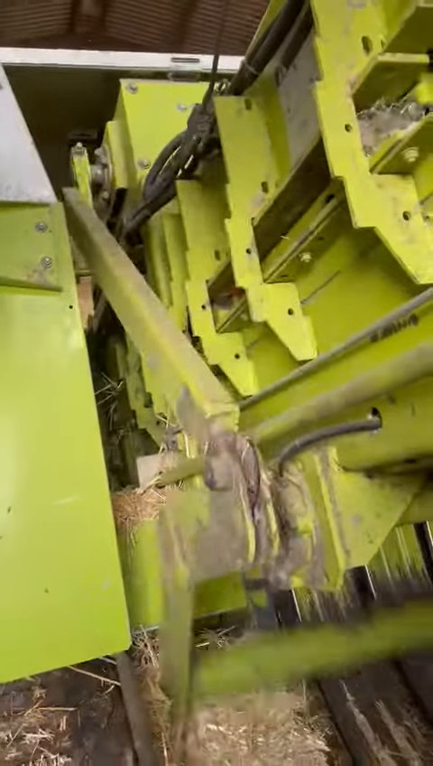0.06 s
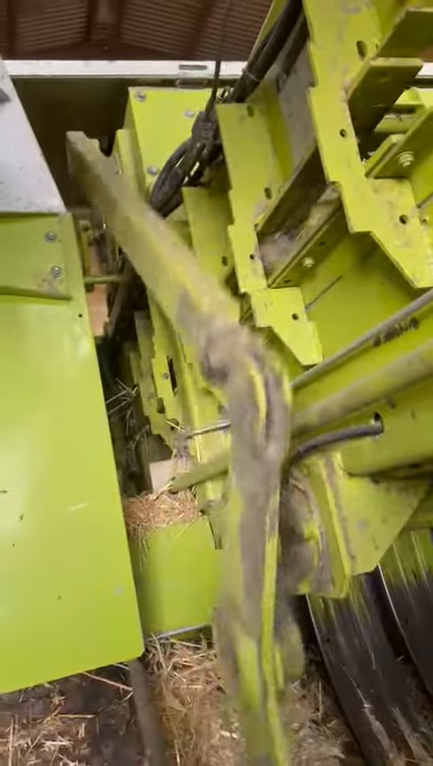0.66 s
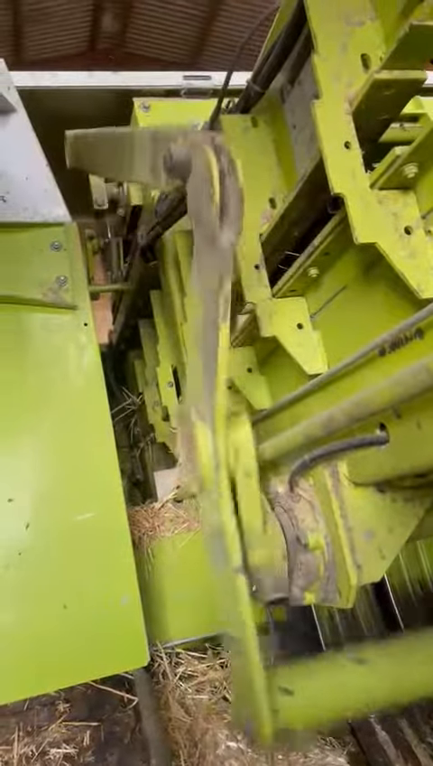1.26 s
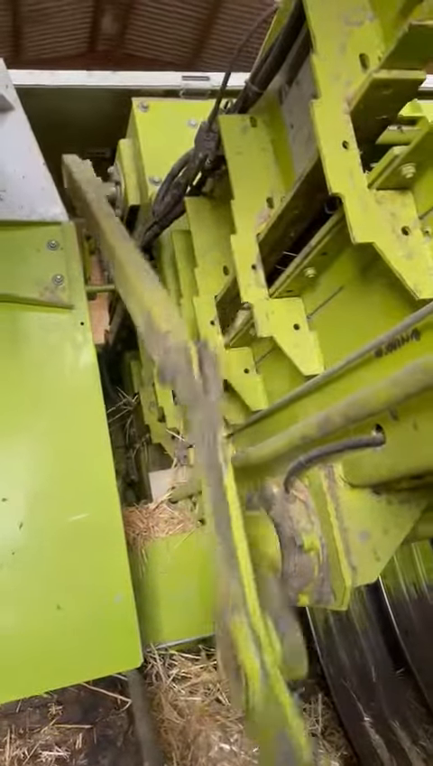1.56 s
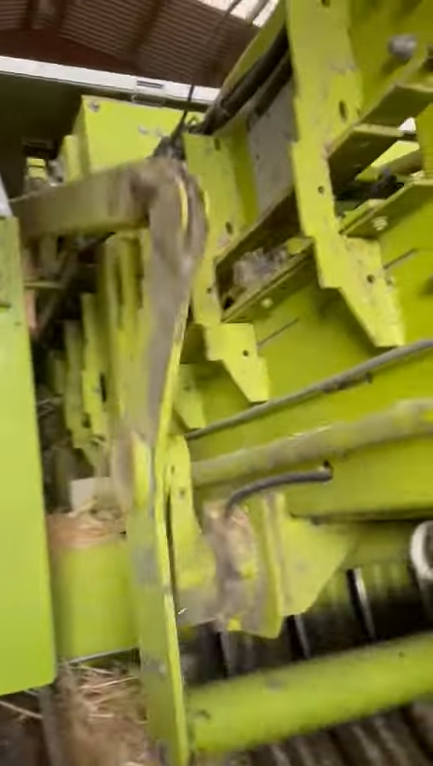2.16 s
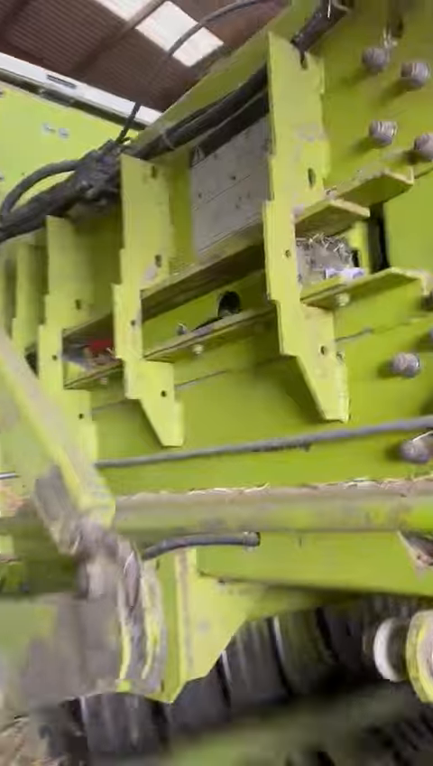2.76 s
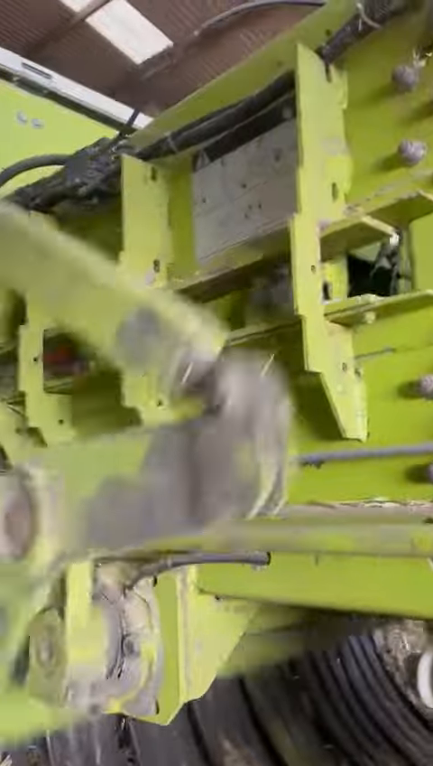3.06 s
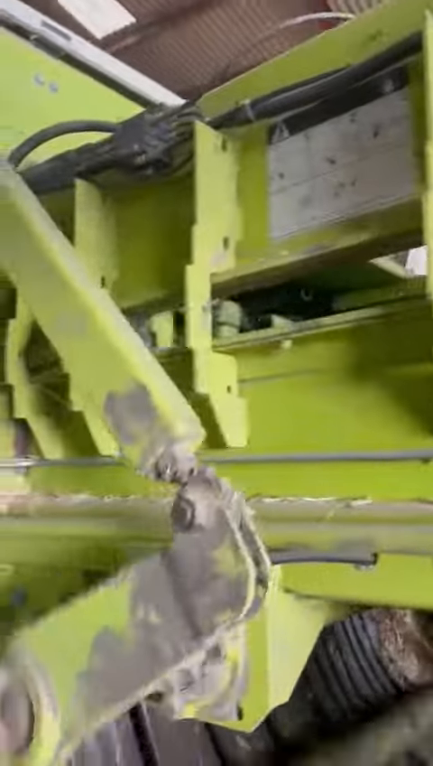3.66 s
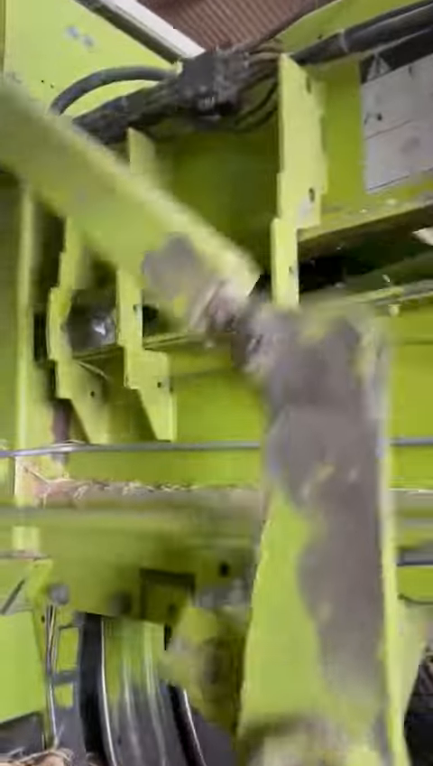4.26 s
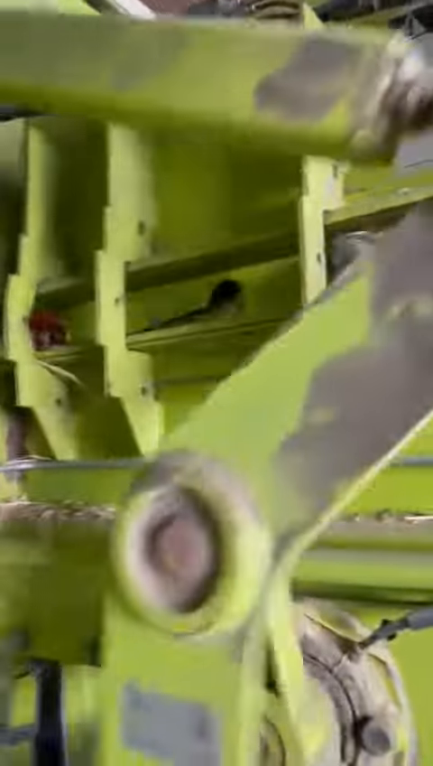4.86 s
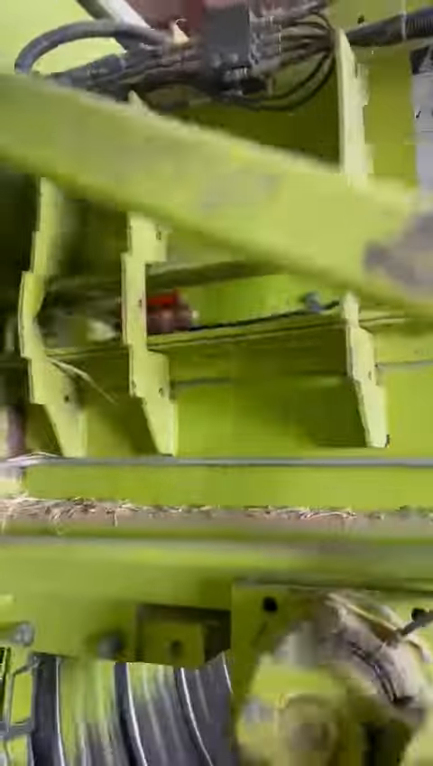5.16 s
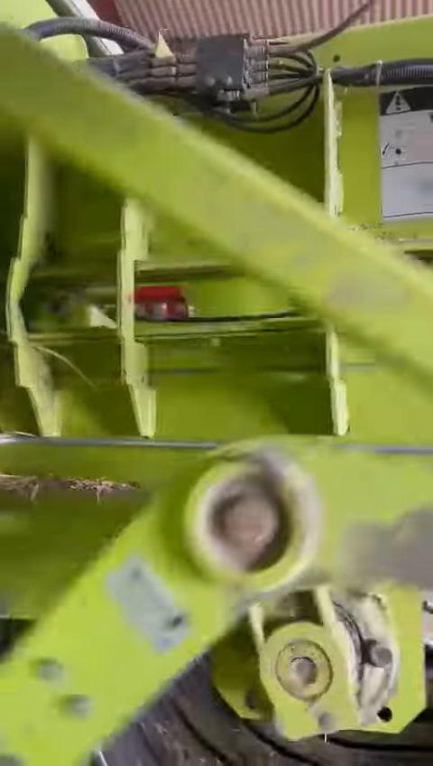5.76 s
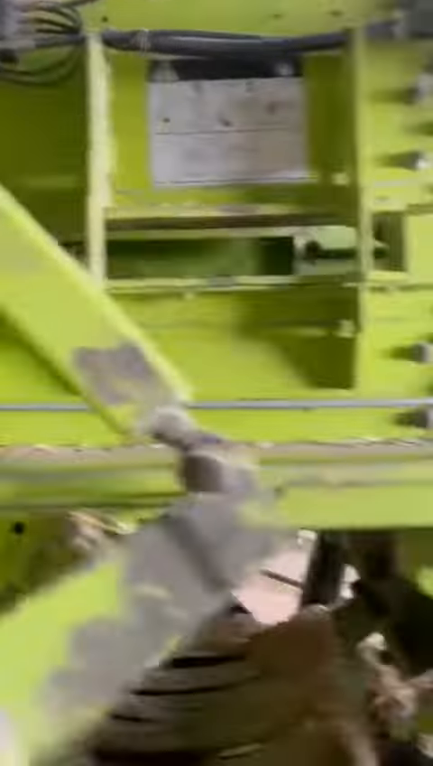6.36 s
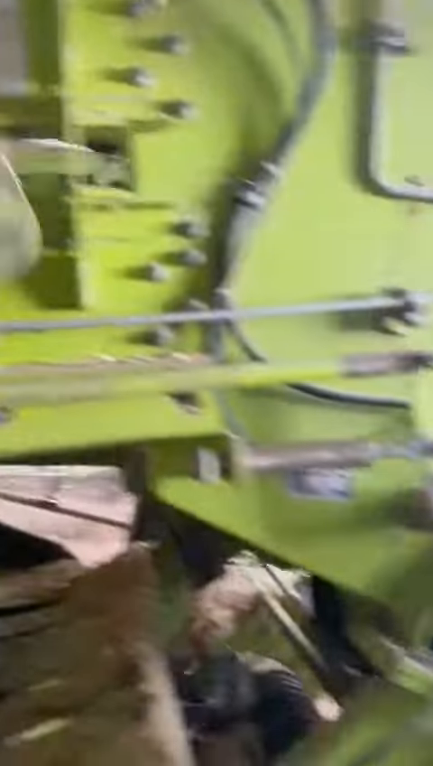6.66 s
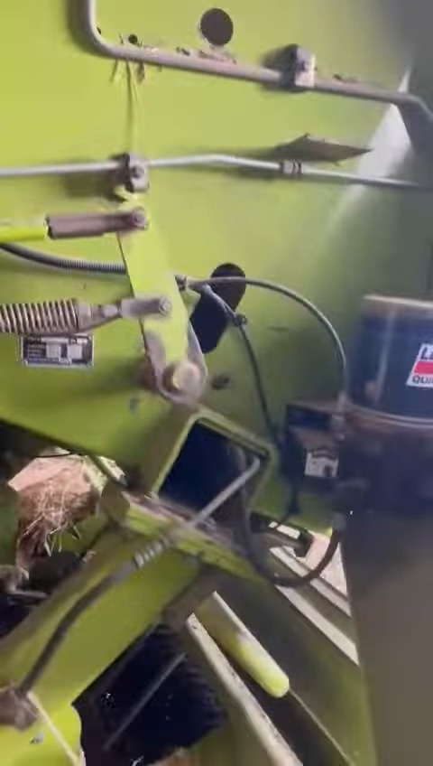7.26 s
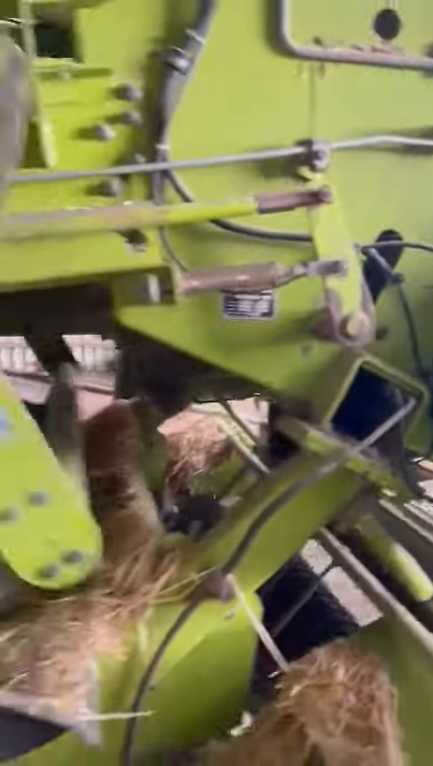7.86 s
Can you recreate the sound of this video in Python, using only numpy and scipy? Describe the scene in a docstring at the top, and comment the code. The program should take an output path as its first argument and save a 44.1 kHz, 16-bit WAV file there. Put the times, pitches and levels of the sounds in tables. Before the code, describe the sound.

Heard up close, a farm baler rumbles steadily while its steel linkage clanks and knocks, its chain rattles and rubbing parts squeak.

```python
"""Square baler in a shed.

Heard beside the linkage. Panels rumble; a sprocket drones; a gear whines and a chain sizzles once
per shaft turn. A slower part rubs and squeaks, small fittings clink. With the plunger strokes,
straw thuds, the frame booms, loose pins clank and the feed rake knocks."""
import sys
import numpy as np
from scipy import signal
from scipy.fft import rfft, irfft, next_fast_len
from scipy.io import wavfile
from scipy.ndimage import map_coordinates

SR = 44100
rng = np.random.default_rng(int(sys.argv[2]) if len(sys.argv) > 2 else 0)


def int16_out(signal):
    """Quantize to a 16-bit WAV file."""
    q = np.round(np.clip(np.atleast_2d(signal).T, -1, 1) * 32767)
    wavfile.write(sys.argv[1], SR, q.astype(np.int16))


N = 348831
T = np.arange(N) / SR
STROKE_S, SHAFT_HZ = 1.378, 15.748

# Modes of a small fitting. Each row: frequency in Hz, level in dB, t60 in seconds.
FITTING_MODES = [(3100, -3, 0.099), (3470, -13, 0.38), (4430, -8.5, 0.35), (4876, -0.5, 0.077),
                 (5220, -4, 0.12), (5460, -5, 0.18), (6200, -3, .07), (9700, -20, .06)]
# Spectrum of small steel parts touching. Each row: frequency in Hz, density in dB.
JINGLE_SPECTRUM = [(2000, -16), (3300, 2), (4300, 2), (5600, 4.5), (7000, -21), (9500, 4), (11500, 3)]


def amp(db):
    """Decibels to gain."""
    return 10 ** (np.asarray(db) / 20)


def unit(x):
    """Scale to rms 1."""
    return x / np.sqrt(np.mean(x ** 2) + 1e-20)


def along(points, hz):
    """Interpolate (Hz, value) points on a log axis."""
    f, v = np.transpose(points)
    return np.interp(np.log(hz + 1), np.log(f + 1), v)


def curves(rows):
    """One value per sample for each column after the time."""
    s, *cols = np.transpose(rows)
    return [np.interp(T, s, c) for c in cols]


def wobble(rate_hz):
    """Smooth random curve, rate_hz knots a second."""
    return map_coordinates(rng.standard_normal(2048), [T * rate_hz], mode="mirror")


def swell(period_s, peak_s):
    """Cycle between -1 and 1."""
    return np.cos(2 * np.pi * (T - peak_s) / period_s)


def filtered(x, response):
    """Apply a complex frequency response."""
    n = x.shape[-1]
    m = next_fast_len(n + 8192)
    return irfft(rfft(x, m) * response(np.fft.rfftfreq(m, 1 / SR)), m)[..., :n]


def coloured(x, spectrum):
    """x through a (Hz, dB) spectrum, at rms 1."""
    return unit(filtered(x, lambda hz: amp(along(spectrum, hz))))


def noise(spectrum, shape=N):
    """Steady noise with a (Hz, dB) spectrum, at rms 1."""
    return coloured(rng.standard_normal(shape), spectrum)


def ticks(rate_hz):
    """Tiny impacts of random time and size."""
    return unit(rng.standard_normal(N) * (rng.random(N) < rate_hz / SR))


def add(track, start_s, sound):
    """Mix a sound into the track."""
    i = max(round(start_s * SR), 0)
    track[i:i + len(sound)] += sound[:N - i]


def throb(turns, depth_db, tight_turn):
    """The drive snaps tight once a shaft turn and eases off more slowly."""
    angle = 2 * np.pi * (turns - tight_turn)
    return unit(amp(depth_db * (np.cos(angle) - 0.25 * np.sin(2 * angle))))


def feeder_load(first_s=0.0064, rise_s=0.038, fall_s=0.1):
    """The feeder lunges three times a stroke; its load rises quickly to 1 and ebbs."""
    age_s = (T - first_s) % (STROKE_S / 3)
    load = (1 - np.exp(-age_s / rise_s)) * np.exp(-age_s / fall_s)
    return load / load.max()


def shed(x):
    """Reverberation: mids linger, treble dies first."""
    # Each row: frequency in Hz, t60 in seconds.
    decay = [(100, 0.28), (1000, 0.51), (4000, 0.16), (12000, 0.015)]
    hz, t, bins = signal.stft(rng.standard_normal(SR // 2), SR, nperseg=256)
    tail = signal.istft(bins * amp(-60 * t / along(decay, hz)[:, None]), SR, nperseg=256)[1]
    return signal.fftconvolve(x, tail / np.linalg.norm(tail))[:N]


def panels():
    """Small jolts shake sheet panels: the rumble follows the plunger, the body the feeder."""
    # Each row: time in seconds, rumble level in dB.
    rumble_levels = [(0, -22), (.9, -18.5), (2.3, -20.5), (3.7, -20), (4.9, -20), (5.7, -24), (6.5, -19.5),
                     (7.91, -20.5)]
    # Each row: frequency in Hz, density in dB.
    rumble_spectrum = [(15, -41), (28, -21), (42, -15), (52, -13.5), (62, -5.5), (72, -6.5), (85, 1.5),
                       (104, -2), (128, -8), (170, -5.5), (260, -57.5)]
    body_spectrum = [(90, -12), (135, 1), (170, 1), (200, 3.5), (230, 1), (285, -0.5), (335, 0),
                     (400, -4.5), (500, -1.5), (600, -6.5), (700, -11), (1000, -17.5), (2000, -42.5)]
    rumble_db = curves(rumble_levels)[0] + 1.5 * swell(STROKE_S, peak_s=0.77) + wobble(9)
    body_db = -22.5 + 4 * feeder_load()
    return amp(rumble_db) * noise(rumble_spectrum) + amp(body_db) * noise(body_spectrum)


def sprocket(turns, ratio=0.4495, teeth=22, sway_rad=0.79, jitter_rad=0.38):
    """Teeth meet the chain in a rough drone; runout sways pitch and level once a sprocket turn."""
    # Each row: time in seconds, levels of harmonics 1, 2 and 3 in dB before trim.
    harmonic_levels = [(0, -19, -23, -26.5), (0.6, -21, -54, -26), (1.2, -29.5, -42, -25),
                       (1.9, -26, -31.5, -23.5), (2.6, -18, -28.5, -27.5), (3.6, -23, -31, -30.5),
                       (4.2, -35, -30, -29.5), (4.8, -23, -28.5, -25), (5.6, -22, -24.5, -35),
                       (6.3, -21, -27, -29.5), (7.1, -26, -22.5, -24), (7.91, -22, -27.5, -24)]
    trim_db = [-1, -2, -0.5]
    angle = 2 * np.pi * ratio * turns
    out = np.zeros(N)
    for k, db in enumerate(curves(harmonic_levels)):
        phase = (k + 1) * teeth * angle + sway_rad * np.sin(angle) + jitter_rad * wobble(16)
        strength = 1 + 0.24 * np.cos(angle) + 0.36 * wobble(24)
        out += amp(db + trim_db[k]) * unit(strength * np.sin(phase))
    return out


def gear(turns, gain_db, tight_turn=0.59, rough_db=-4.5):
    """Off-centre gear: mesh tone and rough tooth contact swell once a turn."""
    # Each row: time in seconds, relative level in dB.
    levels = [(0, -23.5), (0.6, -27.5), (3.9, -26.5), (4.4, -25), (5.3, -24), (6.5, -25.5), (7.3, -28.5),
              (7.91, -21.5)]
    # Mesh tone and sidebands. Each row: shaft order, level in dB.
    mesh = [(33, 1), (34, 3.5), (35, -3), (36, -10), (40, -4.5)]
    angle = 2 * np.pi * (turns - tight_turn)
    drift_rad = 0.32 * wobble(18)
    whine = sum(amp(db + 3.9 * wobble(6)) * np.sin(order * angle + drift_rad) for order, db in mesh)
    rough = noise([(300, -54), (450, 3.5), (560, -7.5), (640, -12), (900, -27)])
    rough *= throb(turns, 6.7, tight_turn)
    return amp(curves(levels)[0] + gain_db) * (unit(whine) + amp(rough_db) * rough)


def link_pings(spectrum, spread_db, count=2800, t60_s=0.08):
    """Chain links ping at random, each with its own pitch and size."""
    t = np.arange(SR // 25) / SR
    when, pitch, size = rng.random((count, 3)).T[:, :, None]
    hz = 2800 + 4200 * pitch
    rings = amp(-spread_db * np.log(size + 0.05) - 60 * t / t60_s) * np.sin(2 * np.pi * hz * t)
    samples = (when * N).astype(int) + np.arange(len(t))
    return coloured(np.bincount(samples.ravel(), rings.ravel(), N)[:N], spectrum)


def singing_steel(flare_db=6):
    """Chain jolts keep steel resonances ringing; each flares and fades on its own."""
    # Each row: frequency in Hz, bandwidth in Hz, level in dB.
    resonances = [(1110, 130, 12), (2796, 32, 8), (2890, 20, -4), (3590, 28, 1.5), (4240, 48, 3),
                  (5200, 44, 4.5), (5630, 35, -1)]
    out = np.zeros(N)
    for hz, width, db in resonances:
        ring = unit(filtered(ticks(400), lambda f: 1j * f * width / (hz * hz - f * f + 1j * f * width)))
        out += amp(db) * unit(ring * amp(flare_db * np.tanh(wobble(9))))
    return unit(out)


def chain(turns):
    """Rollers clatter on the sprockets, keep the steel singing and sizzle as the chain tightens."""
    # Each row: time in seconds, relative level in dB.
    levels = [(0, -39.5), (.9, -40), (1.4, -37.5), (2.3, -39), (3.3, -36.5), (4.5, -42.5), (5.1, -37),
              (6.7, -37), (7.91, -38)]
    # Each row: frequency in Hz, density in dB.
    clatter_spectrum = [(350, -30), (700, -1), (1000, -4), (1600, -4.5), (2800, -9.5), (4000, -22),
                        (6500, -36), (12000, -57)]
    link_spectrum = [(1200, -10), (3000, 2), (4300, -1.5), (5600, -8), (6800, 1.5), (8000, -22),
                     (9500, -22), (11500, 5)]
    clatter = coloured(ticks(4000), clatter_spectrum) * amp(1.36 * wobble(35))
    clatter *= throb(turns, 0.78, 0.78) * amp(-33 + 0.5 * feeder_load())
    links = unit(noise(link_spectrum) + link_pings(link_spectrum, spread_db=2.5))
    snatch_turns = turns + 0.034 * wobble(36)  # never tightens at quite the same angle
    links *= throb(snatch_turns, 2.6, 0.53) * amp(1.7 * wobble(22))
    singing = singing_steel()
    flicker_db = 3 * wobble(16) + 2 * wobble(3) + 3 * wobble(200)
    tension = unit(throb(snatch_turns, 11, 0.59) * amp(flicker_db))
    sizzle = tension * noise([(4000, -17), (5800, -31), (6800, 12), (8000, -2), (9500, -1), (11500, 4.5)])
    steel = amp(0.5) * links + amp(-1.5) * singing + amp(2.5) * sizzle
    return clatter + amp(curves(levels)[0]) * steel


def chain_jingles(gain_db):
    """Links clink and scrape together while the chain hangs slack."""
    # Each row: middle in seconds, length in seconds, relative level in dB.
    spells = [(1.014, 0.079, -36), (1.466, 0.043, -39.5), (1.869, 0.079, -34), (2.545, 0.044, -31),
              (3.397, 0.15, -38), (4.268, 0.25, -38), (4.5, 0.061, -37), (4.592, 0.093, -34.5),
              (5.407, 0.094, -32), (5.689, 0.085, -31.5), (6.008, 0.053, -29), (6.126, 0.062, -32),
              (6.318, 0.18, -36.5), (6.519, 0.066, -37), (6.792, 0.13, -39.5), (7.003, 0.17, -36)]
    slack = sum(amp(db) * np.exp(-(2 * (T - mid_s) / length_s) ** 4) for mid_s, length_s, db in spells)
    links = unit(link_pings(JINGLE_SPECTRUM, spread_db=1.5) + 0.8 * noise(JINGLE_SPECTRUM))
    return amp(gain_db) * slack * unit(links * amp(1.1 * wobble(90)))


def loose_parts(count=110, ring_db=-14.5, spread_db=34.5, t60_s=0.11):
    """Small parts tick at random, each time ringing a new mix of the fitting's modes."""
    # Each row: time in seconds, relative level in dB.
    levels = [(0, -34), (3.8, -35), (4.6, -28), (6.8, -22), (7.91, -21.5)]
    out, t = np.zeros(N), np.arange(SR // 16) / SR
    hz, mode_db, _ = np.transpose(FITTING_MODES)[:, :, None]
    for when, softness in rng.random((count, 2)):
        mix = rng.standard_normal(hz.shape) * amp(mode_db)
        ring = unit((mix * np.sin(2 * np.pi * hz * rng.normal(1, 0.03) * t)).sum(0))
        tick = noise(JINGLE_SPECTRUM, len(t)) + amp(ring_db) * ring
        add(out, when * N / SR, amp(-spread_db * softness - 60 * t / t60_s) * tick)
    return amp(curves(levels)[0]) * out


def rubs(tone_db=-4, scrape_db=2, flare_db=7, waver=0.015, rasp=0.016):
    """Steel rubs steel about every 1.1 s: a dry scrape in which the part's modes flare at random."""
    # Each row: end in seconds, length in seconds, relative level in dB.
    passes = [(0.642, 0.085, -32), (1.775, 0.13, -33), (2.858, 0.18, -36), (3.99, 0.16, -32),
              (5.107, 0.18, -32), (6.191, 0.14, -29.5), (7.299, 0.21, -31)]
    # Each row: frequency in Hz, level in dB.
    modes = [(3550, -2.5), (3970, -2), (5250, -5.5), (5600, -5.5), (5960, 0.5), (9400, -1), (10100, -11),
             (10700, 1), (11250, 1.5)]
    contact = sum(amp(db) * np.exp(-(2 * (T - end_s) / length_s + 1) ** 6)
                  for end_s, length_s, db in passes)
    tone = np.zeros(N)
    for hz, db in modes:
        cycles = np.cumsum(hz * (1 + waver * wobble(90) + rasp * wobble(900))) / SR
        tone += amp(db + flare_db * np.tanh(wobble(70))) * np.sin(2 * np.pi * cycles)
    scrape = noise([(2500, -20), (3600, 14), (4500, -3), (5600, 12), (6500, -18),
                    (7600, -17), (8700, -7), (10000, 1), (11500, 11)])
    return contact * (amp(tone_db) * unit(tone) + amp(scrape_db + 3.3 * wobble(120)) * scrape)


def squeaks(gain_db, sag=0.014, waver=0.0057, rasp=0.0081, overtone_db=-3.5):
    """Where the rub grips, one mode sings a short chirp that sags in pitch."""
    # Each row: start in seconds, length in seconds, relative level in dB, pitch in Hz.
    grips = [(0.53, 0.09, -34.5, 5850), (0.593, 0.043, -35, 5880), (1.647, 0.035, -36.5, 5970),
             (1.668, .1, -35, 5770), (1.724, 0.041, -34, 3540), (2.755, 0.036, -33.5, 5850),
             (3.831, .03, -34, 3750), (3.858, .025, -35, 3560), (4.48, .025, -33, 5760),
             (4.497, 0.031, -35, 5250), (4.583, .028, -37, 5600), (4.914, .035, -31.5, 4040),
             (4.957, 0.028, -31, 3550), (4.979, .025, -34, 5500), (5.011, 0.025, -35.5, 5260),
             (5.03, .03, -33, 4000), (5.053, 0.019, -34.5, 5700), (5.067, .02, -31, 3600),
             (6.075, 0.035, -31.5, 3560), (6.091, .028, -33, 5900), (6.771, 0.043, -42, 5150),
             (7.118, 0.039, -39, 5000), (7.16, .026, -38.5, 5860), (7.197, 0.024, -32.5, 3500),
             (7.218, 0.032, -36, 5400), (7.255, .034, -36, 3920), (7.262, 0.031, -31, 5670)]
    out = np.zeros(N)
    for start_s, length_s, db, hz in grips:
        progress = np.linspace(0, 1, round(length_s * SR))
        slow, fast = (noise([(edge_hz, 0), (2 * edge_hz, -40)], len(progress)) for edge_hz in (50, 400))
        pitch_hz = hz * (1 + sag * (0.5 - progress) + waver * slow + rasp * fast)
        phase = 2 * np.pi * np.cumsum(pitch_hz) / SR
        tone = unit(np.sin(phase) + amp(overtone_db) * np.sin(2 * phase))
        arch = np.sqrt(np.abs(np.sin(np.pi * progress)))
        add(out, start_s, amp(db + gain_db + 1.9 * slow + 2.3 * fast) * arch * tone)
    return out


def straw_thuds(gain_db, rise_s=0.0062, fall_s=0.054):
    """Plunger and feeder pack a wad of straw; the dull push shakes the bale chamber."""
    # Each row: start in seconds, relative level in dB.
    wads = [(0.914, -8.5), (1.431, -17.5), (2.319, -31), (3.25, -31), (3.679, -22.5), (4.182, -17),
            (5.09, -13), (5.228, -18), (6.42, -16.5), (7.72, -21)]
    # Each row: frequency in Hz, density in dB.
    spectrum = [(25, -13), (50, 7), (100, 11.5), (150, 3), (250, 1.5), (400, 0), (700, -7.5), (1000, -21),
                (2000, -55)]
    t = np.arange(SR // 2) / SR
    push = (1 - np.exp(-t / rise_s)) * np.exp(-t / fall_s)
    shaking = np.zeros(N)
    for start_s, db in wads:
        add(shaking, start_s, amp(db + gain_db) * push / push.max())
    return shaking * noise(spectrum)


def contacts(t, slack_s, rise_s, t60_s, touch_db, rebound_db):
    """Envelope of one blow: the part touches, crosses its slack, seats and rebounds."""
    energy = 0
    for delay_s, db in [(0, touch_db), (slack_s, 0), (2 * slack_s, rebound_db)]:
        age_s = np.maximum(t - delay_s, 0)
        energy += (amp(db - 60 * age_s / t60_s) * (1 - np.exp(-age_s / rise_s))) ** 2
    return np.sqrt(energy)


def blows(hits, modes, rattle, gain_db, ring_db, crack_db, touch_db, rebound_db, jostle_rad, detune):
    """Each blow cracks, rattles the plates and rings modes: one favoured, the rest randomly detuned."""
    # Steel meeting steel. Each row: frequency in Hz, density in dB.
    crack_spectrum = [(300, -11), (1500, -2), (3000, 1), (5500, -1.5), (7500, -24), (12000, -11)]
    out, t = np.zeros(N), np.arange(SR // 2) / SR
    hz, mode_db, mode_t60_s = np.transpose(modes)[:, :, None]
    for start_s, db, favoured_hz, boost_db, slack_s, rise_s, rattle_t60_s in hits:
        envelope = lambda t60_s: contacts(t, slack_s, rise_s, t60_s, touch_db, rebound_db)
        distance_hz = np.abs(hz - favoured_hz)
        favoured = distance_hz == distance_hz.min()
        pitch_hz = np.where(favoured, favoured_hz, hz * (1 + detune * rng.standard_normal(hz.shape)))
        size = amp(mode_db + np.where(favoured, boost_db, 2 * rng.standard_normal(hz.shape)))
        # Loose parts chop their own ring and shake it out of tune.
        buzz = 1 + 0.26 * noise([(60, 2), (300, -44)], len(t))
        jostle = jostle_rad * noise([(70, 10), (250, -56)], (len(hz), len(t)))
        phase = 2 * np.pi * (pitch_hz * t + rng.random(hz.shape)) + jostle
        ring = buzz * (size * envelope(mode_t60_s) * np.sin(phase)).sum(0)
        crack = envelope(t60_s=0.02) * noise(crack_spectrum, len(t))
        plates = envelope(rattle_t60_s) * noise(rattle, len(t))
        add(out, start_s, amp(db + gain_db) * (plates + amp(ring_db) * ring + amp(crack_db) * crack))
    return out


def fitting_clinks():
    """A small hard fitting bounces and rings high."""
    # Each row: start in seconds, level in dB, favoured Hz, its boost in dB,
    # then slack, rise and rattle t60 in seconds.
    hits = [(.283, -36, 6200, 4, 0.0029, .0005, .04), (2.254, -25, 4840, 3, .006, .0005, 0.055),
            (2.559, -18, 4310, 6, 0.0075, .0005, 0.046), (3.331, -32, 3180, 6, .006, 0.00056, .046),
            (4.192, -13, 5200, -7, 0.0096, .003, 0.21), (4.229, -9, 3625, 17.5, 0.0016, 0.00027, 0.036),
            (4.482, -26, 4890, 5, 0.0054, .001, .09), (4.775, -13, 5220, -3.5, 0.0076, 0.0013, 0.08),
            (5.231, -23, 6150, 2, .005, 0.00055, .039), (5.934, -24, 4300, 3, 0.0071, .0005, .049),
            (6.128, -15, 5460, 8, .007, .001, 0.11), (6.285, -15.5, 4270, 12.5, 0.0073, 0.00043, 0.081),
            (6.744, -26, 5250, 11, .006, .001, .07), (6.924, -16.5, 5220, -4, 0.0044, .001, 0.11),
            (7.003, -16, 5460, 3, 0.0042, .0005, .05), (7.775, -23, 6150, 5, 0.0051, 0.00036, 0.055)]
    # Each row: frequency in Hz, density in dB.
    rattle = [(800, -3), (2000, -0.5), (3300, -6), (5000, -1.5), (6300, -3), (8000, 3), (10000, -5),
              (12000, 2)]
    return blows(hits, FITTING_MODES, rattle, gain_db=-8.5, ring_db=-9, crack_db=-7,
                 touch_db=1, rebound_db=-1, jostle_rad=0.65, detune=0.0069)


def frame_booms():
    """The frame booms under blows and shoves."""
    # Each row: start in seconds, level in dB, favoured Hz, its boost in dB,
    # then slack, rise and rattle t60 in seconds.
    hits = [(.498, -9.5, 1440, 7, 0.0073, 0.0046, 0.16), (.917, -15.5, 229, 12, .002, 0.00063, 0.043),
            (.945, -9.5, 776, 6, 0.016, 0.007, .12), (.99, -18.5, 1050, 1, 0.0066, .0028, 0.17),
            (2.32, -13, 785, 13, .008, 0.0073, 0.3), (2.745, -8, 790, 4, 0.0067, 0.0065, 0.13),
            (3.246, -9.5, 1308, 12, .011, 0.0023, 0.17), (3.672, -7, 1304, 3.5, .008, 0.0084, 0.13),
            (3.719, -14, 1520, 4, 0.0094, .005, 0.11), (5.095, -7.5, 1126, 10, 0.011, .0008, 0.12),
            (5.503, -8.5, 786, 6.5, .008, 0.00052, 0.089), (5.996, -11.5, 1150, 8, 0.0094, 0.0046, 0.17),
            (6.43, -8.5, 1158, 8.5, 0.014, 0.012, 0.089), (6.479, -15.5, 1130, 10, 0.0038, .002, 0.033),
            (6.516, -19, 2480, 2, 0.0069, .001, 0.052), (7.829, -17, 1060, 9, 0.014, .0035, 0.31)]
    # Each row: frequency in Hz, level in dB, t60 in seconds.
    modes = [(221, 8, 0.17), (790, -1, 0.1), (1021, 2, .07), (1136, 3.5, 0.16), (1315, 3.5, .085),
             (1456, 4, .08), (2620, -1.5, 0.26), (3740, -24, .1)]
    # Each row: frequency in Hz, density in dB.
    rattle = [(50, -8), (200, 15), (600, 13), (1100, 4), (1800, 4.5), (3000, -2), (5000, -6), (12000, -26)]
    return blows(hits, modes, rattle, gain_db=-8.5, ring_db=-13.5, crack_db=-10,
                 touch_db=-1, rebound_db=-10, jostle_rad=0.52, detune=0.012)


def pin_clanks():
    """Loose pins clank as they take up their play."""
    # Each row: start in seconds, level in dB, favoured Hz, its boost in dB,
    # then slack, rise and rattle t60 in seconds.
    hits = [(.085, -7, 2500, 12.5, 0.009, 0.00047, .06), (.49, -10.5, 1910, 6, 0.0064, 0.00036, 0.023),
            (1.423, -16.5, 2400, 5, .009, 0.0048, 0.28), (2.752, -16.5, 2934, 13, .009, .006, .04),
            (2.839, -10.5, 1970, 10, 0.01, .0003, 0.13), (2.885, -23, 2934, 14, 0.011, 0.011, 0.069),
            (3.247, -14, 3540, 12, .008, 0.00033, .06), (4.16, -15.5, 1980, 14, 0.0082, 0.0067, 0.18),
            (5.096, -14.5, 3770, 6, 0.0069, 0.00033, 0.058), (5.504, -23, 2200, 4, 0.0073, .0003, 0.049),
            (5.594, -12.5, 1970, 9.5, 0.0087, 0.00032, 0.22), (5.613, -16.5, 5190, 8, 0.0043, .0003, 0.06),
            (5.998, -22, 3620, 9, .008, .001, .07), (6.455, -19, 2250, 9, .016, 0.0066, 0.13),
            (6.511, -20, 2200, 10, 0.0052, .0005, 0.046), (6.923, -16.5, 2950, 8, 0.0077, 0.0037, 0.2)]
    # Each row: frequency in Hz, level in dB, t60 in seconds.
    modes = [(1366, 0.5, .07), (1723, -6.5, .2), (1975, 2, 0.041), (2250, -2, 0.036), (2536, -7.5, 0.13),
             (2934, -8.5, 0.57), (3180, -3, .08), (3560, -2.5, 0.057), (3980, -1, .07), (4850, -3, 0.065),
             (5080, 0, 0.08), (5220, -10, 0.092), (5960, -11, .07), (6060, -17, .08)]
    # Each row: frequency in Hz, density in dB.
    rattle = [(250, 1), (800, 9), (1300, 2.5), (2400, 2), (3500, -2.5), (5000, -6.5), (6500, -3.5),
              (12000, -13.5)]
    return blows(hits, modes, rattle, gain_db=-7, ring_db=-11.5, crack_db=3,
                 touch_db=-3.5, rebound_db=-8, jostle_rad=0.65, detune=0.015)


def rake_knocks():
    """The feed rake knocks as it reverses, once a stroke."""
    # Each row: start in seconds, level in dB, favoured Hz, its boost in dB,
    # then slack, rise and rattle t60 in seconds.
    hits = [(.721, -14, 1510, 4, 0.0026, 0.00022, 0.11), (2.096, -13.5, 2298, 2, 0.0096, 0.00025, 0.09),
            (3.477, -13, 1795, 2, 0.0082, .0004, 0.094), (4.849, -17, 888, 16.5, 0.0045, 0.00035, 0.17),
            (6.23, -14, 1505, -4, 0.0088, 0.00034, 0.13), (7.61, -16.5, 1890, -1, 0.0053, .0004, 0.093)]
    # Each row: frequency in Hz, level in dB, t60 in seconds.
    modes = [(927, -3, 0.03), (1416, 1, 0.05), (1570, 8, 0.035), (1820, 6, 0.031), (1960, -2, 0.082),
             (2220, -0.5, 0.063)]
    # Each row: frequency in Hz, density in dB.
    rattle = [(200, 4), (700, 7.5), (1200, 2.5), (1900, -7.5), (2700, -4), (4000, -7.5), (6000, -16),
              (12000, -44)]
    return blows(hits, modes, rattle, gain_db=-5, ring_db=-6.5, crack_db=-12,
                 touch_db=-2.5, rebound_db=-18, jostle_rad=1.0, detune=0.02)


def scene():
    """The whole machine, with diffuse sound from the sides."""
    # Each row: frequency in Hz, diffuse side gain in dB.
    width = [(50, -71), (150, -54), (350, -24), (750, -19.5), (1300, -26.5), (2000, -37), (2900, -11),
             (4500, -4.5), (5400, -8), (6300, -13), (7300, -30), (9200, -35), (10500, -28)]
    surge_hz = 0.03 * swell(2 * STROKE_S, peak_s=2.66)
    turns = np.cumsum(SHAFT_HZ + surge_hz) / SR
    linkage = rake_knocks() + pin_clanks() + frame_booms() + fitting_clinks() + loose_parts()
    machine = linkage + amp(-7.5) * shed(linkage)
    machine += chain_jingles(gain_db=1.5) + rubs() + squeaks(gain_db=-1)
    machine += panels() + straw_thuds(gain_db=0.5)
    machine += sprocket(turns) + gear(turns, gain_db=-2) + chain(turns)
    side = filtered(shed(machine), lambda hz: amp(along(width, hz)))
    return np.array([machine + side, machine - side])


def record(dry, top_hz=12100):
    """Two microphone ports differ in phase and level; the top treble rolls off."""
    # Each row: frequency in Hz, left phase lead in radians.
    phase_lead = [(250, 0), (600, -.25), (1300, 0), (2150, 0), (2600, .7), (4200, .4), (4820, -.4),
                  (5600, .4), (6120, 1.4), (6950, 3.1), (8400, 3.2), (10000, 6.1), (10500, 6.28)]
    # Each row: frequency in Hz, left over right in dB.
    balance = [(100, 0), (350, 1.5), (620, 1.5), (1120, 0), (2000, 0), (3620, -1), (6500, 0)]
    # Each row: frequency in Hz, gain in dB.
    rolloff = [(9200, -0.5), (11200, -5.5), (12000, -22)]

    def ports(hz):
        left = np.exp(0.5j * along(phase_lead, hz)) * amp(along(balance, hz) / 2)
        return np.array([left, 1 / left]) * amp(along(rolloff, hz))
    return filtered(filtered(dry, ports), lambda hz: hz < top_hz)


dry = scene()
out = record(dry)
int16_out(out)
```